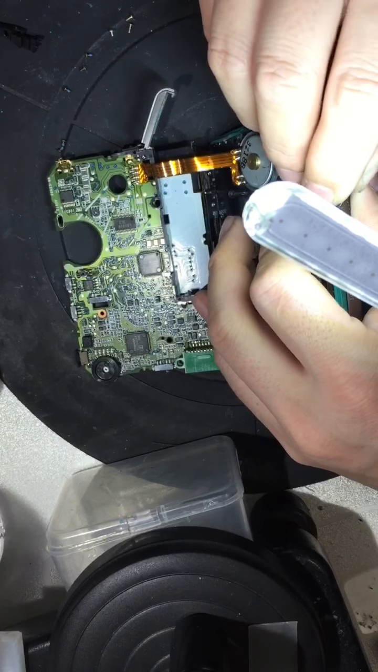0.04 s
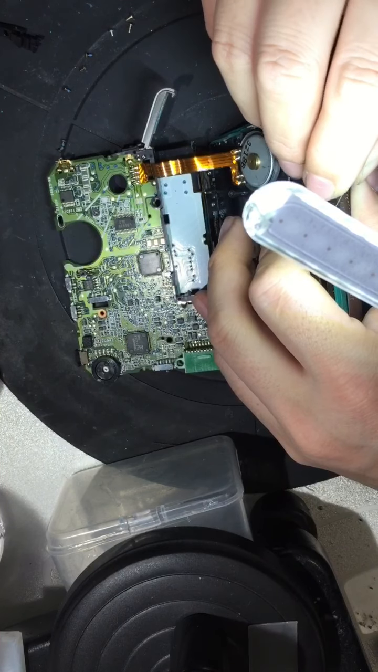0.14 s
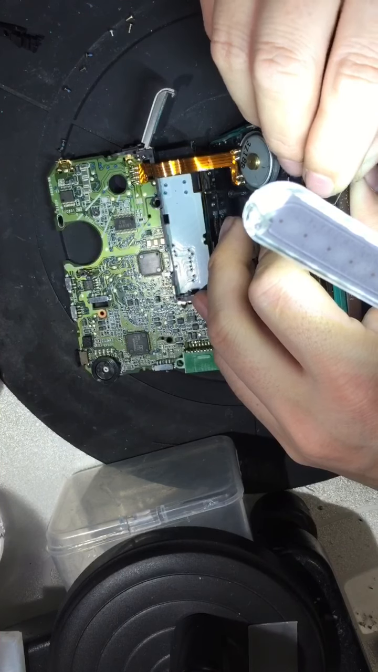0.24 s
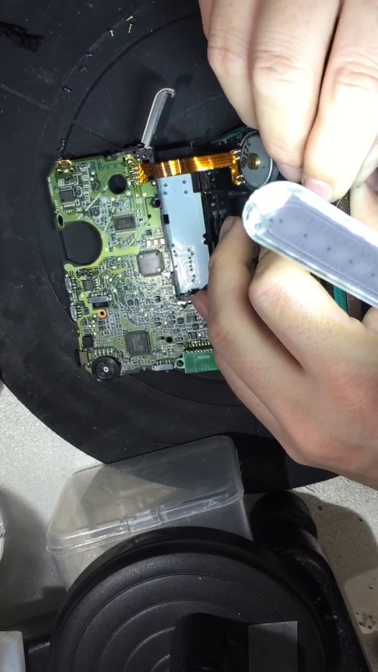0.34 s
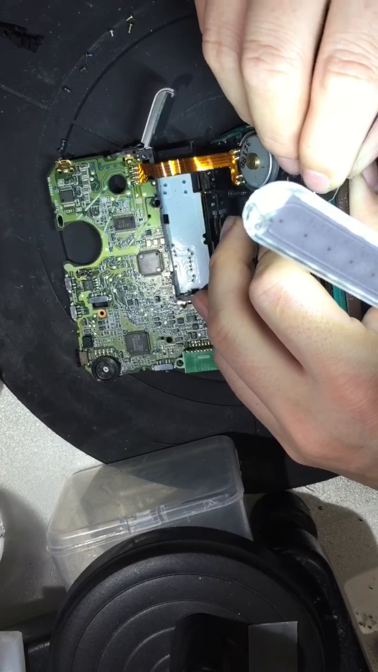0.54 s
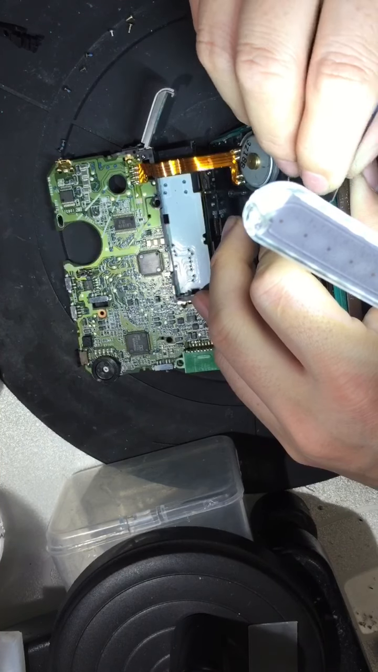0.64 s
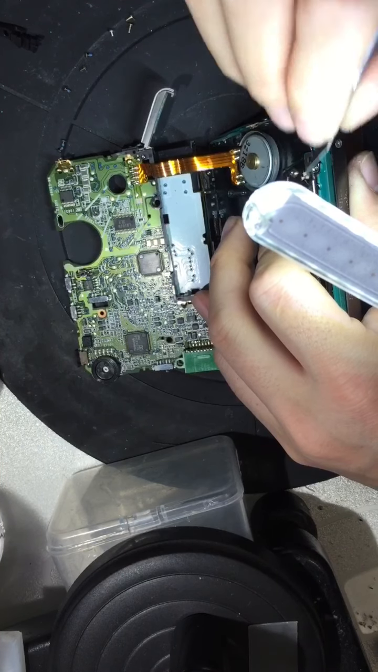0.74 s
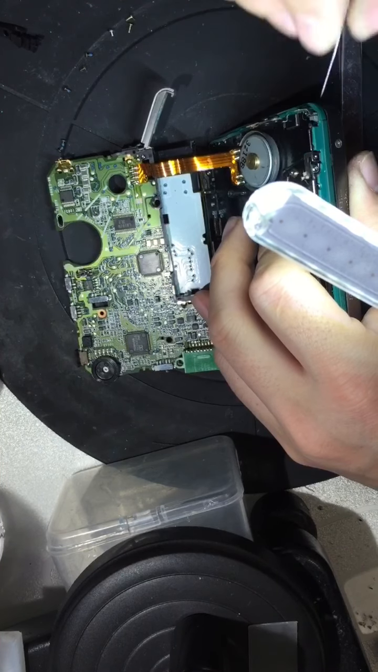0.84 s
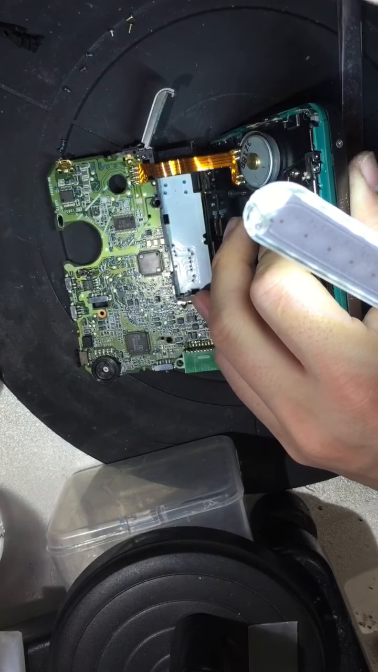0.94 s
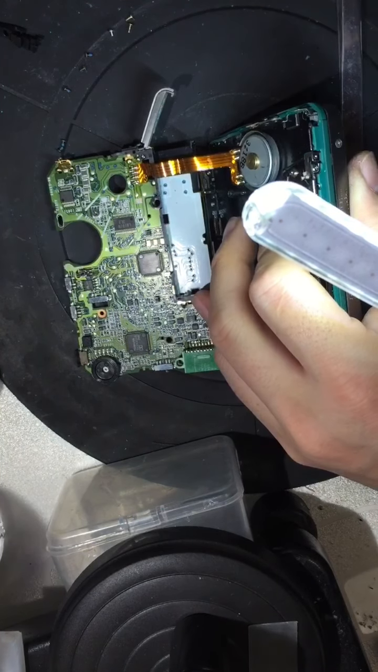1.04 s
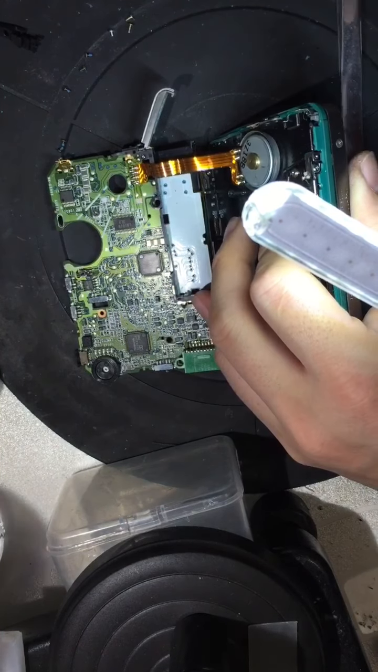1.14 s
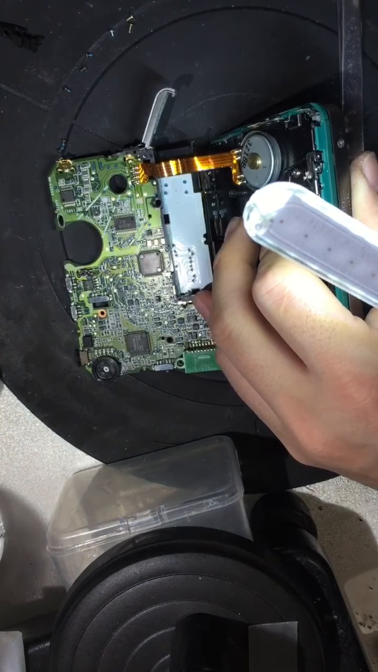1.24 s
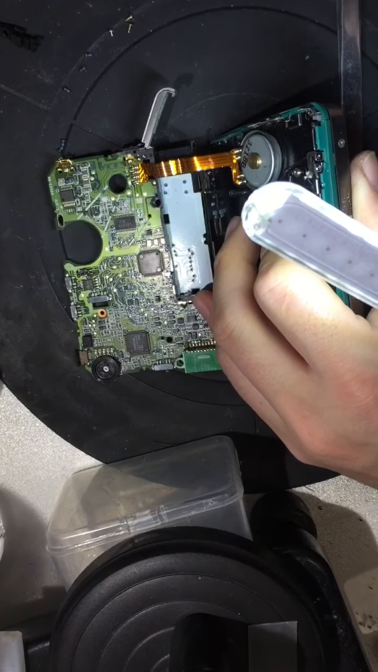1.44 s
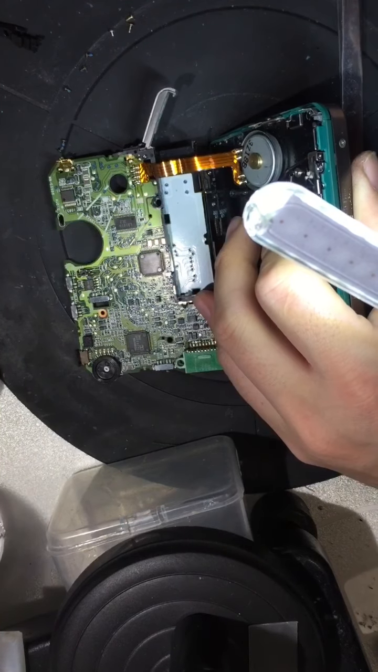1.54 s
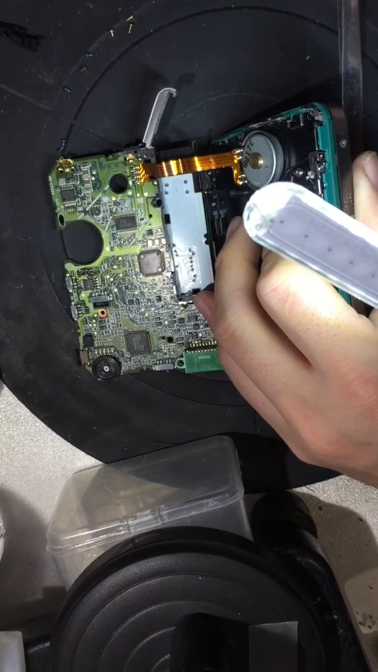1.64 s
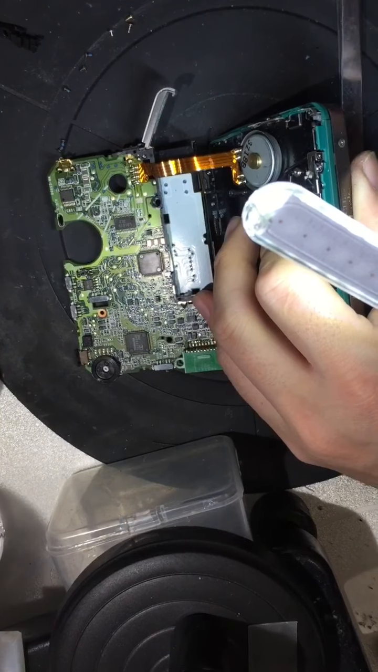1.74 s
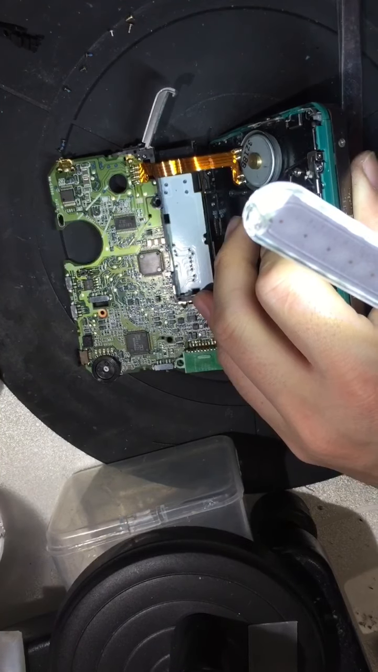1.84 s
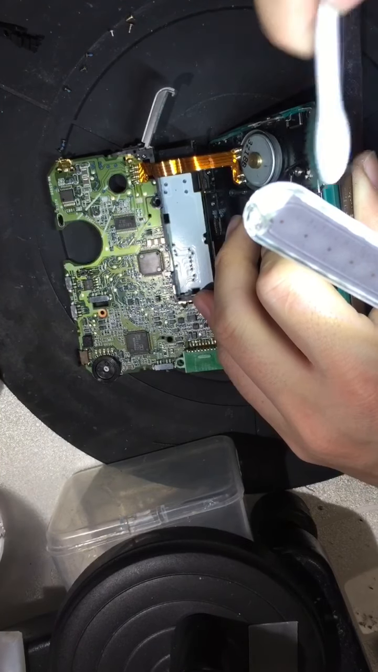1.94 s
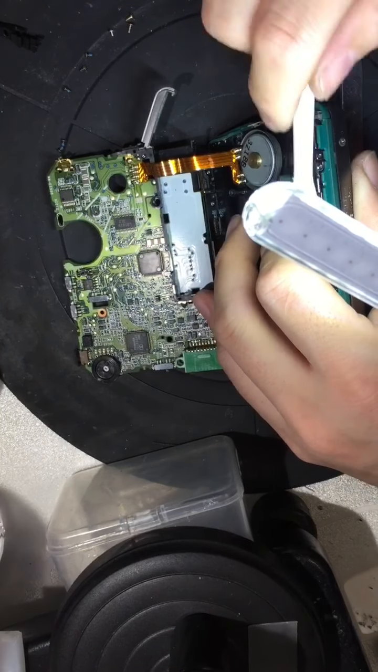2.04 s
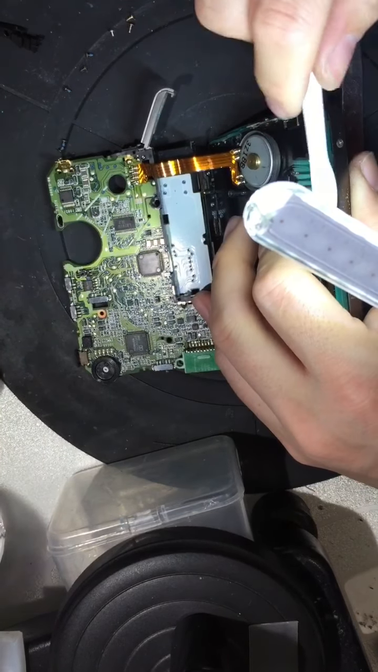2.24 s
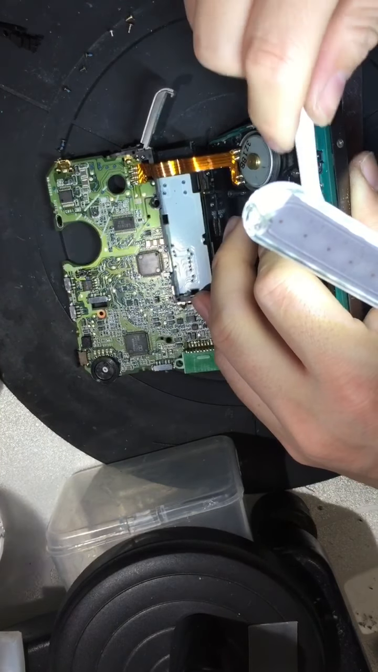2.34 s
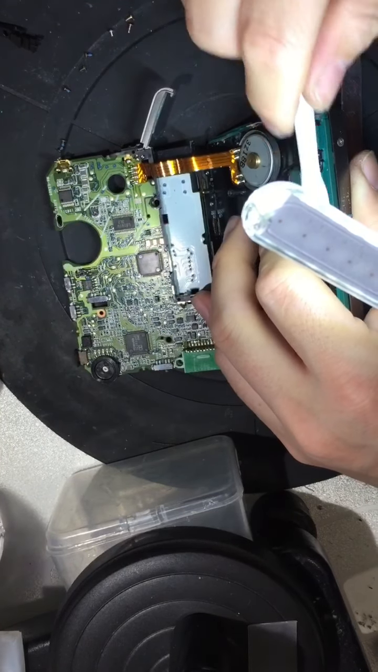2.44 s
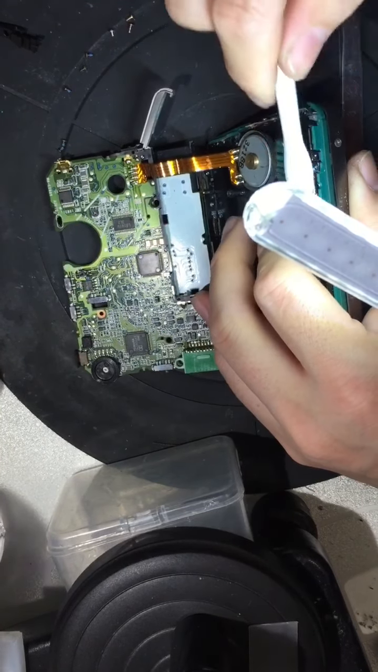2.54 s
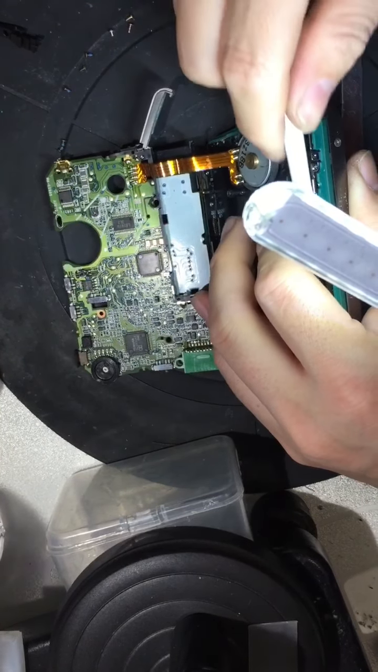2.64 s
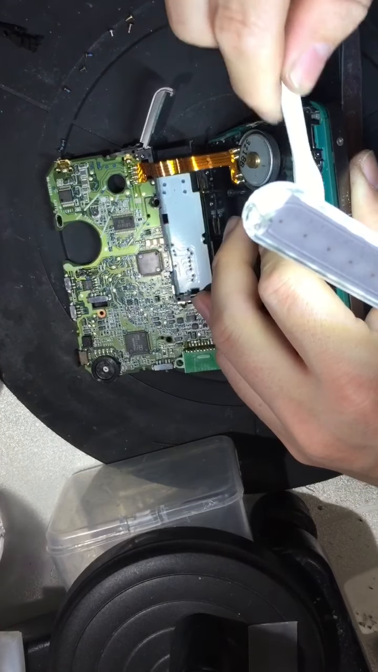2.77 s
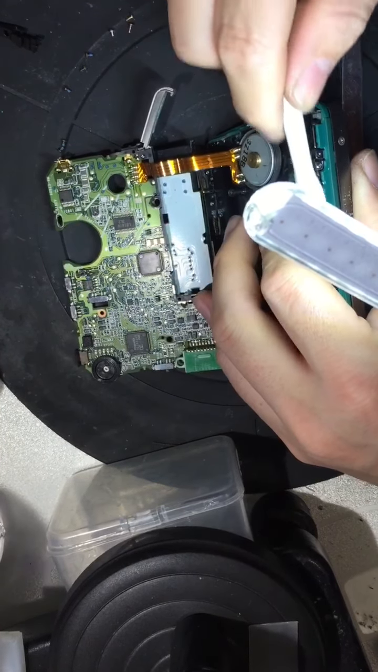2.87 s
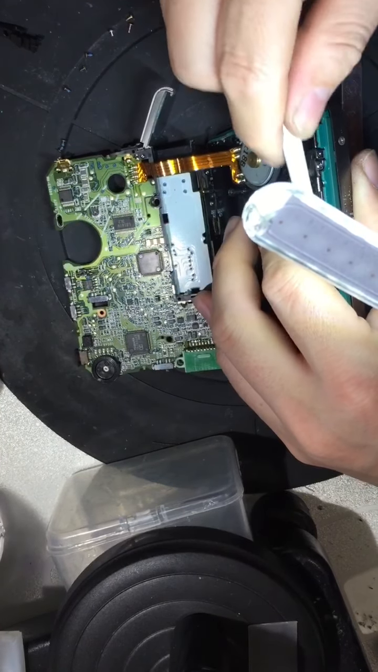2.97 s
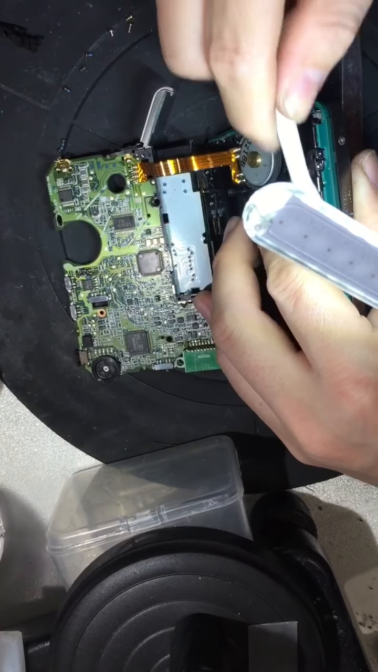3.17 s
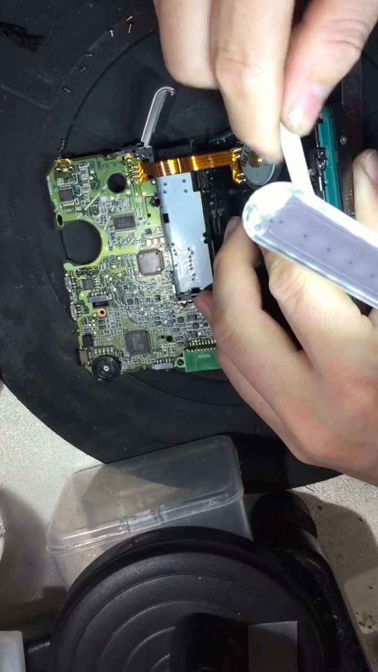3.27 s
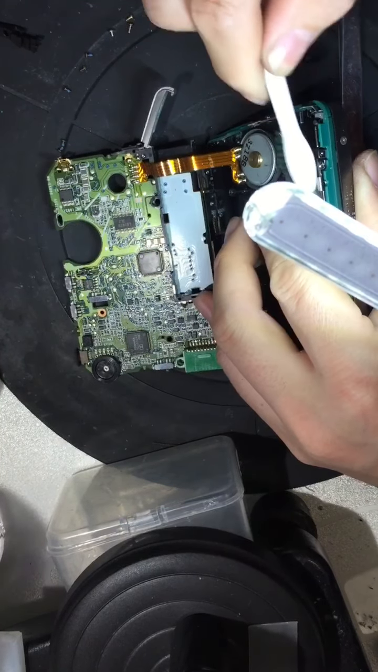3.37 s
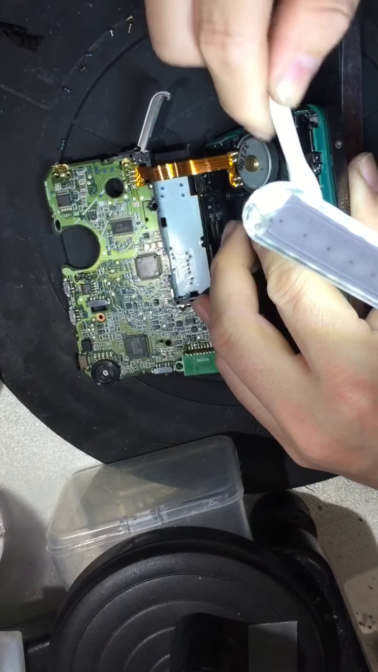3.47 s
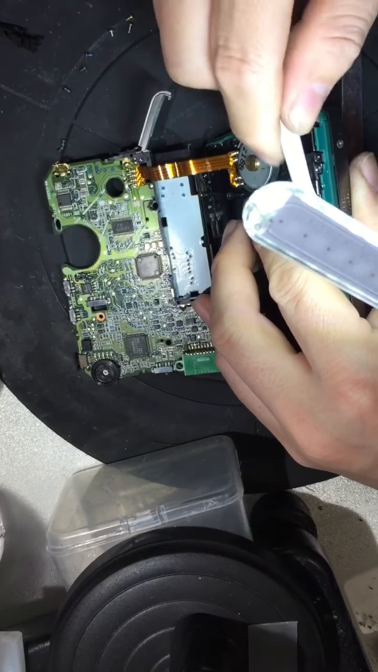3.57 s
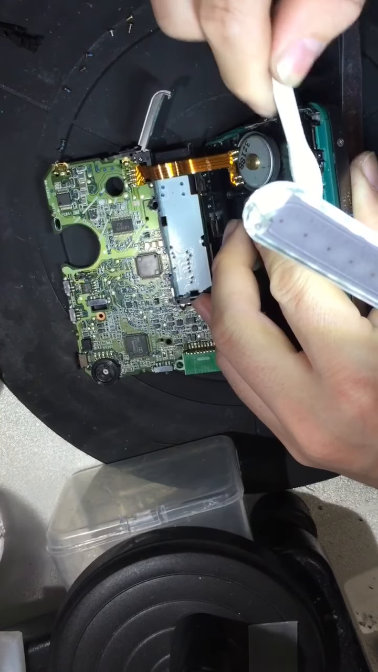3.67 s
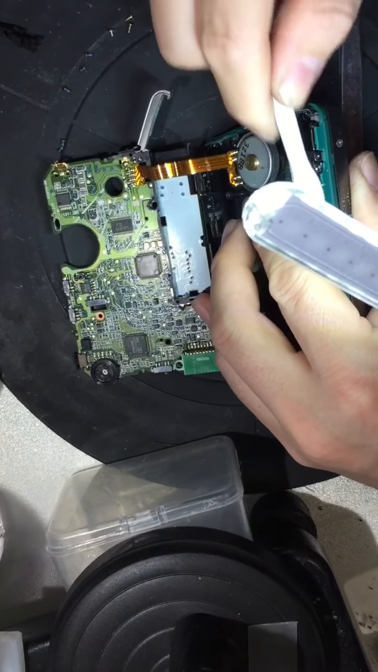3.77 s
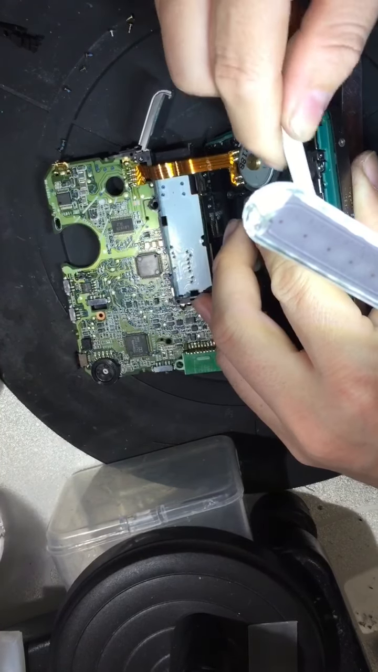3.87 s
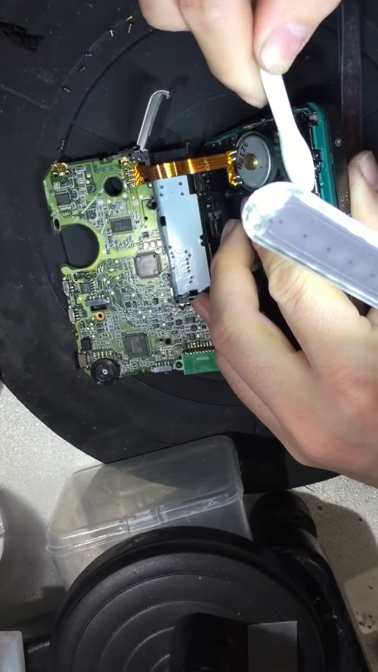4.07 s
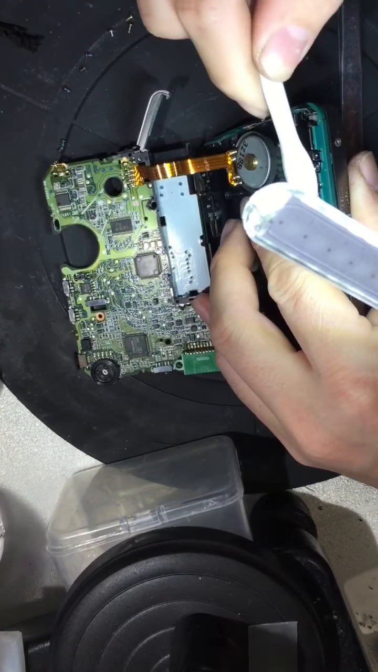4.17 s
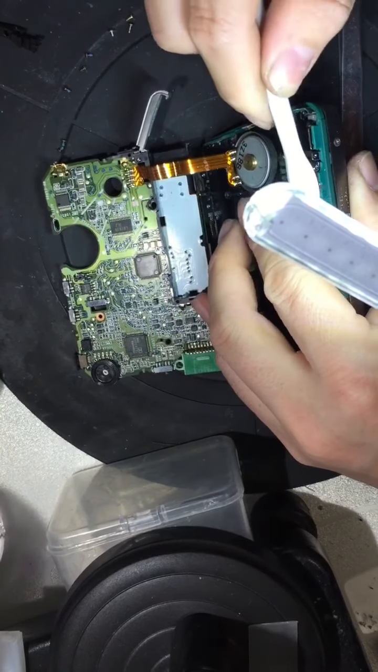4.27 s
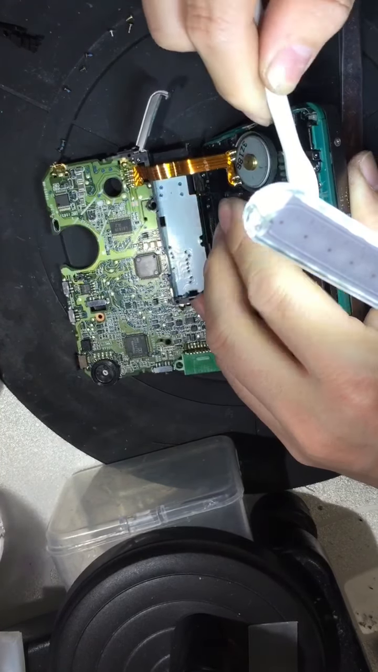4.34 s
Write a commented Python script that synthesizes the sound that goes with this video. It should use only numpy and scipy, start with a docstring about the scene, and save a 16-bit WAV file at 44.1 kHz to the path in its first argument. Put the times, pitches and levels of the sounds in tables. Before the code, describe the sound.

At a quiet bench in a small dry room, fingers softly rub a plastic case and tweezers tick. They are set down with one loud, bright clack and a small rattle. After a brief pause, a plastic tool scrapes in short hissy strokes with light knocks; later strokes are much stronger, with the case dragging dully. Close microphone, faint low background noise.

```python
"""A quiet repair bench, where an opened portable cassette player is worked on in a small, dry room. Tweezers
tick as bright noise cracks over ringing arms and go down with a clack that rings the work plate. A finger winds
a pulley in scraping strokes and fingers rub: random tiny slips drive resonances of parts, chassis and case.
Parts knock as short pushes into the chassis; the case drags as dull filtered slips. Hands and blows make a low
rumble in the bench, over faint steady background noise."""
import sys
import numpy as np
from scipy import signal
from scipy.fft import rfft, irfft
from scipy.io import wavfile

SR = 44100
rng = np.random.default_rng(int(sys.argv[2]) if len(sys.argv) > 2 else 0)


def digitize_waveform(pressure):
    """Quantize a signal to 16-bit integers and store it at the path in sys.argv[1].

    Rows of a 2-D input are taken as channels; values are limited to [-1, 1].
    """
    field = np.atleast_2d(pressure).T
    bounded = np.clip(field, -1, 1)
    quanta = np.round(bounded * 32767).astype(np.int16)
    wavfile.write(sys.argv[1], SR, quanta)


N = 340011
TIME = np.arange(N) / SR
HALF_SECOND = SR // 2   # samples


def from_db(db):
    """Decibels to gain."""
    return 10 ** (np.asarray(db) / 20)


def rms_one(x):
    """Scale to unit power."""
    return x / np.sqrt(np.mean(x ** 2) + 1e-20)


def peak_one(x):
    """Scale so that the eight strongest samples average one."""
    return x / np.mean(np.sort(np.abs(x))[-8:])


def add(track, s, sound):
    """Mix a short sound into a track at time s."""
    at = max(round(s * SR), 0)
    track[at:at + len(sound)] += sound[:max(N - at, 0)]


def colour(x, spectrum):
    """Causal (minimum-phase) filter with the given spectrum, built by folding its cepstrum."""
    size = 8192
    hz, db = np.transpose(spectrum)
    grid = np.maximum(np.arange(size // 2 + 1) * SR / size, 1)
    curve_db = np.interp(np.log(grid), np.log(hz), db)
    cepstrum = irfft(np.log(from_db(curve_db)))
    cepstrum[1:size // 2] *= 2
    cepstrum[size // 2 + 1:] = 0
    impulse = irfft(np.exp(rfft(cepstrum)))
    return signal.fftconvolve(x, impulse)[:len(x)]


def burst(t60):
    """A contact's brief chatter: noise that dies away by 60 dB in t60 seconds."""
    return rng.standard_normal(HALF_SECOND) * from_db(-60 * TIME[:HALF_SECOND] / t60)


def ring(modes, spread_db):
    """Decaying sines, with strengths that differ from blow to blow."""
    t = TIME[:HALF_SECOND]
    out = 0
    for k, (hz, db, t60) in enumerate(modes):
        strength_db = db + spread_db * rng.standard_normal()
        decay = from_db(strength_db - 60 * t / t60)
        out = out + (-1) ** k * decay * np.sin(2 * np.pi * hz * t)
    return out


def friction(per_s, spread_db):
    """Tiny slips of uneven size, at random moments."""
    sizes = from_db(spread_db * np.minimum(rng.exponential(1, N), 5))
    signs = rng.choice([-1, 1], N)
    slipping = rng.random(N) < per_s / SR
    return rms_one(sizes * signs * slipping)


def grip(rate, depth_db, order=N):
    """The contact catches and eases at random: a gain that glides to a new value rate times a second."""
    steps = TIME[:order] * rate
    points = rng.standard_normal(4096)
    return np.interp(steps, np.arange(len(points)), from_db(depth_db * points))


def resonate(force, modes, wander_db):
    """Parallel resonances; the moving point of contact feeds now one, now another."""
    out = 0
    for k, (hz, width, db) in enumerate(modes):
        r = np.exp(-np.pi * width / SR)
        poles = [1, -2 * r * np.cos(2 * np.pi * hz / SR), r * r]
        drive = force * grip(rate=45, depth_db=wander_db, order=len(force)) + 1e-18
        gain = (-1) ** k * from_db(db) * (1 - r * r) / 2
        out = out + gain * signal.lfilter([1, 0, -1], poles, drive)
    return out


# spectrum of the background noise: (frequency [Hz], level [dB])
AIR_COLOUR = [(20, -9), (60, 4.5), (130, -2), (280, -5), (700, -10.5), (1500, -13), (3000, -16),
              (8000, -22), (16000, -27.5)]
AIR_DB = -71


def air():
    """Faint steady noise, strongest in the bass."""
    return from_db(AIR_DB) * rms_one(colour(rng.standard_normal(N), AIR_COLOUR))


# spectrum of the bench rumble: (frequency [Hz], level [dB])
RUMBLE_COLOUR = [(25, -33), (62, -9.5), (85, -16), (117, 5), (138, -8.5), (155, -4), (173, -12),
                 (193, -5.5), (250, -16.5), (400, -28.5), (800, -55.5)]
RESTING_DB = -78.5   # rumble from hands resting on the case
DRAG_WEIGHT_DB = -4.5   # rumble in the bench relative to the drag
SHUDDER_DB, SHUDDER_T60_S = -14.5, 0.41   # after a blow, relative to its thud setting
BENCH_LAG_S, BENCH_SETTLE_S = 0.011, 0.012   # delay; smoothing time constant


def handling():
    """Every stroke, rub, shove and blow leans on the bench, which rumbles and settles."""
    load = from_db(RESTING_DB) ** 2 + (from_db(DRAG_WEIGHT_DB) * drag_level()) ** 2
    for s, rise, fall, db, weight_db in STROKES:
        add(load, s + BENCH_LAG_S, (from_db(weight_db) * stroke_speed(rise, fall, db)) ** 2)
    for s, length, db, weight_db in RUBS:
        add(load, s + BENCH_LAG_S, (from_db(weight_db) * rub_speed(length)) ** 2)
    for s, clack_db, thud_db in BLOWS:
        shudder_db = thud_db + SHUDDER_DB - 60 * TIME[:SR] / SHUDDER_T60_S
        add(load, s, from_db(shudder_db) ** 2)
    keep = np.exp(-1 / (BENCH_SETTLE_S * SR))
    pressure = np.sqrt(signal.lfilter([1 - keep], [1, -keep], load))
    rumble = rms_one(colour(friction(per_s=1000, spread_db=2.5), RUMBLE_COLOUR))
    return pressure * rumble


def rub_speed(length):
    """A fingertip slides in one flat arch."""
    progress = np.minimum(TIME[:HALF_SECOND] / length, 1)
    return np.abs(np.sin(np.pi * progress)) ** 0.4


# fingertips rubbing on the case: (time [s], length [s], level [dB], weight on the bench [dB])
RUBS = [(0.042,0.075,-53.5,-53), (0.223,0.072,-71,-75), (0.362,0.057,-60,-51.5), (0.466,0.051,-53,-64),
        (0.65,0.035,-66,-47), (0.761,0.032,-55.5,-50.5), (0.81,0.081,-82,-49.5), (1.037,0.088,-62.5,-61),
        (1.307,0.27,-72,-55.5), (4.349,0.076,-67.5,-63.5), (7.189,0.067,-81.5,-67)]
# hollow resonances of the case: (frequency [Hz], width [Hz], level [dB])
CASE = [(560, 38, 9), (1030, 130, -7.5), (2395, 66, 4), (3050, 160, -0.5), (3510, 260, -5), (5360, 260, -1),
        (6180, 1200, -15), (9080, 1600, -14.5), (11770, 2840, -21.5)]


def rubbing():
    """Skin drags softly over the case and sounds its hollow resonances."""
    pressure = np.zeros(N)
    for s, length, db, weight_db in RUBS:
        add(pressure, s, from_db(db) * rub_speed(length))
    slips = friction(per_s=4000, spread_db=2.0)
    return pressure * rms_one(resonate(slips, CASE, wander_db=8.5))


# parts knocking on the chassis: (time [s], level [dB], sharp edge rel. level [dB], part's own pitch [Hz])
KNOCKS = [(0.075,-50.5,-20,585), (0.665,-46,-22,560), (0.846,-41.5,-16,2270), (0.853,-38,-30,860),
          (0.861,-44,-38,735), (1.053,-37.5,-6.5,1450), (1.399,-20.5,-10.5,1240), (1.43,-30,-9,2920),
          (1.523,-48,-16,2960), (1.661,-40.5,-30,2880), (1.666,-38.5,-29,2610), (1.704,-46.5,-32,2708),
          (2.266,-28.5,-5.5,2100), (2.291,-36.5,-20,2240), (2.402,-39,-11,2200), (2.519,-43,-8.5,1200),
          (2.6,-41,-7,1430), (2.714,-43,-42,580), (2.981,-31,-44,1320), (3.271,-27.5,-15,1320),
          (3.463,-39.5,-15,1730), (3.487,-37.5,-14,1150), (3.545,-41,-20,3570), (3.605,-29,-16,1540),
          (3.898,-26,-16,1487), (4.04,-39,-25,1400), (4.09,-38.5,-25.5,1160), (4.548,-51,-27,574),
          (4.606,-31,-21,1590), (4.992,-45.5,-10.5,2040), (5.058,-34,-34,1020), (5.078,-34.5,-30,1440),
          (5.176,-57,11,3800), (5.317,-29,-13.5,3940), (5.794,-35,-20.5,565), (5.808,-58,-10,800),
          (6.473,-32,-11.5,1960), (6.643,-40.5,-5,2250), (6.679,-25,-34,1034), (6.895,-23,-34,890),
          (7.237,-43,-41,2460), (7.657,-37.5,-29.5,826)]
# resonances of the chassis, also shaken by scraping: (frequency [Hz], width [Hz], level [dB])
CHASSIS = [(570, 64, 2.5), (894, 220, -5.5), (1166, 62, -2), (1465, 51, -3), (1730, 82, -4.5),
           (2176, 67, -3), (2416, 41, -8), (2850, 49, -10.5), (3450, 210, -16.5), (3740, 480, -12),
           (5540, 750, -10.5)]
# spectrum of a knock's sharp edge: (frequency [Hz], level [dB])
KNOCK_EDGE = [(1500, -5.5), (3000, -7.5), (6000, -5), (8000, -11), (16000, -21.5)]
PART_WIDTH = 0.17   # bandwidth of a part's ring, as a share of its pitch


def knocks():
    """A part drops into place: a push and short chatter ring the part and the chassis, with a sharp edge."""
    out = np.zeros(N)
    for s, db, edge_db, part_hz in KNOCKS:
        force = 0.25 * burst(t60=0.029)
        force[0] += 1
        # plastic cushions the push
        force = colour(force, [(2000, 1.0), (4000, -6.0), (8000, -14.5), (16000, -5)])
        body = peak_one(resonate(force, CHASSIS, wander_db=4.2))
        part = peak_one(resonate(force, [(part_hz, PART_WIDTH * part_hz, 0)], wander_db=4))
        edge = peak_one(colour(burst(t60=0.018), KNOCK_EDGE))
        knock = from_db(-6.0) * body + from_db(-6.5) * part + from_db(edge_db + 6) * edge
        add(out, s, from_db(db) * knock)
    return out


ROUNDNESS = 0.74   # exponent of a soft stroke's arch
POINTED_ABOVE_DB, POINTED_PER_DB = -41.5, 1.3   # harder strokes swell to a sharper point


def stroke_speed(rise, fall, db):
    """A stroke speeds up and slows down; above a set level, the harder it is, the more pointed."""
    progress = np.interp(TIME[:HALF_SECOND], [0, rise, rise + fall], [0, 0.5, 1])
    sharpness = ROUNDNESS + POINTED_PER_DB * max(db - POINTED_ABOVE_DB, 0)
    return np.abs(np.sin(np.pi * progress)) ** sharpness


# scraping strokes: (time [s], rise [s], fall [s], level [dB], weight on the bench [dB])
STROKES = [(0.745,0.021,0.018,-53.5,-66), (2.241,0.035,0.062,-56,-62), (2.362,0.071,0.055,-53,-54),
           (2.506,0.066,0.067,-54.5,-56), (2.667,0.083,0.029,-50,-57), (2.804,0.058,0.059,-50,-59),
           (2.956,0.061,0.038,-50.5,-58.5), (3.084,0.074,0.04,-48,-50), (3.241,.078,0.023,-50,-54.5),
           (3.37,.1,.043,-46,-44.5), (3.535,0.053,0.091,-51,-49.5), (3.69,0.1,0.038,-48,-49.5),
           (3.841,0.035,0.099,-49.5,-56.5), (3.989,0.1,0.037,-46,-45), (4.573,0.078,0.023,-48.5,-57),
           (4.698,0.054,.1,-48.5,-52.5), (4.865,0.062,0.038,-46,-54.5), (4.984,0.096,0.043,-48,-48),
           (5.135,0.026,0.11,-55,-59.5), (5.267,0.04,0.058,-46,-49.5), (5.749,0.087,.0085,-36.5,-51),
           (5.986,0.064,0.067,-37.5,-56), (6.182,0.076,0.0073,-40,-54), (6.4,0.064,0.027,-41.5,-52.5),
           (6.599,0.052,0.04,-41.5,-48.5), (6.806,0.062,0.0075,-41,-44), (7.519,0.019,0.013,-54.5,-58.5),
           (7.586,0.02,0.09,-52,-54.5)]
# resonances of the small parts: (frequency [Hz], width [Hz], level [dB])
PARTS = [(2900, 920, -2), (3956, 87, 2), (4560, 110, -7), (5585, 200, 11), (6040, 370, -3.5),
         (6580, 360, -0.5), (7580, 270, -2.5), (8160, 160, -11), (8500, 250, 3), (9180, 130, 3.5),
         (9470, 650, -0.5), (10880, 330, -4.5), (11660, 140, -9), (12900, 200, 5), (12590, 170, -11),
         (13800, 290, -24), (14700, 690, 3), (14180, 600, -0.5)]
# spectrum of the scraping tip: (frequency [Hz], level [dB])
HISS = [(2000, 8.5), (3400, 8.5), (4900, 4.5), (5700, 6), (6700, 11), (7900, 3.5), (9000, 5),
        (10400, -10.5), (11700, 15.5), (13500, -10), (16000, -24)]
# chassis level at a given stroke level; its share of the swing
CHASSIS_DB, CHASSIS_AT_DB, CHASSIS_FOLLOWS = -57.5, -50, 0.66
CATCHES_PER_S, CATCH_DB = 90, -11.5   # the tip snags now and then; level relative to the grit friction


def scraping():
    """Each stroke swells and fades; its slips hiss at the tip, ring the small parts and shake the chassis."""
    hiss, body = np.zeros(N), np.zeros(N)
    for s, rise, fall, db, weight_db in STROKES:
        speed = stroke_speed(rise, fall, db)
        add(hiss, s, speed * from_db(db))
        add(body, s, speed * from_db(CHASSIS_DB + CHASSIS_FOLLOWS * (db - CHASSIS_AT_DB)))
    catching = grip(rate=170, depth_db=1.8)
    tip = rms_one(colour(catching * friction(per_s=7000, spread_db=2.0), HISS))
    # coarse grit is felt by the small parts and the chassis alike
    grit = catching * friction(per_s=1800, spread_db=3.9)
    grit = grit + from_db(CATCH_DB) * friction(per_s=CATCHES_PER_S, spread_db=1.5)
    parts = rms_one(resonate(grit, PARTS, wander_db=4.0))
    chassis = rms_one(resonate(grit, CHASSIS, wander_db=3.2))
    return hiss * (from_db(-10) * tip + from_db(-7.0) * parts) + body * chassis


SETTLE_S, SETTLE_DB, SETTLE_RING_DB = 1.551, -21.5, -14   # first touch: time, level, ringing arms
BOUNCE_GAP_S, BOUNCE_LOSS_DB, BOUNCE_SPREAD_DB = 0.01, 1, 7   # step and loss per touch; random swing +/-


def bounces(count):
    """The dropped tweezers touch again and again, unevenly and on the whole more weakly."""
    touches = []
    for k, (late, luck) in enumerate(rng.uniform(-1, 1, (count, 2))):
        s = SETTLE_S + (k + 0.17 * late) * BOUNCE_GAP_S
        db = SETTLE_DB - k * BOUNCE_LOSS_DB + BOUNCE_SPREAD_DB * luck
        touches.append((s, db, SETTLE_RING_DB))
    return touches


# light metal contacts: (time [s], level [dB], ringing of the tweezers' arms, relative [dB])
TICKS = [(0.763,-37,-32), (0.783,-41,-35), (0.892,-40.5,-32), (1.051,-38.5,-32), (1.13,-31.5,-19),
         (1.163,-46.5,-30), (1.399,-9.5,-23), (1.433,-31,-26), (1.459,-37.5,-26), (1.523,-33,-34),
         (2.128,-56,-30.5), (3.596,-31,-14), (4.43,-52.5,-30.5), (5.147,-39.5,-33), (5.318,-30.5,-29.5),
         (5.611,-58.5,-25), (6.061,-24.5,-33), (6.22,-45,-38), (6.252,-24.5,-34), (6.471,-31.5,-39),
         (7.334,-52,-31.5)]
# spectra of a tick's and a bounce's crack: (frequency [Hz], level [dB])
TICK_COLOUR = [(1500, -12.5), (4000, -7), (6000, -3), (9000, 2.5), (10400, -5.5), (12200, 3.5),
               (16000, -4.5)]
BOUNCE_COLOUR = [(1500, -13), (4000, -15.5), (5500, -6.5), (8800, -2), (10200, 3.5), (11500, 7),
                 (16000, -8.5)]
# modes of the tweezers' arms: (frequency [Hz], level [dB], t60 [s])
TWEEZERS = [(5373, -18, .1), (7500, -12, .05), (8123, -14, .12), (8900, -6, .06), (9700, -10, .04),
            (11110, -7, .13), (11400, -7, .06), (11754, -9, .05), (12256, -9, .04), (14090, -8, .07)]


def ticks():
    """Metal touches give a bright crack; the tweezers' arms ring by an amount set for each touch."""
    out = np.zeros(N)
    for touches, spectrum in ((TICKS, TICK_COLOUR), (bounces(count=6), BOUNCE_COLOUR)):
        for s, db, ring_db in touches:
            crack = peak_one(colour(burst(t60=0.026), spectrum))
            arms = peak_one(ring(TWEEZERS, spread_db=4))
            add(out, s, from_db(db - 4.5) * (crack + from_db(ring_db + 2.5) * arms))
    return out


# blows on the work plate: (time [s], sharp clack level [dB], soft thud level [dB])
BLOWS = [(0.854,-36.5,-55), (1.399,-8.5,-30), (1.432,-30,-29.5), (1.524,-44,-33.5), (1.668,-39,-25.5),
         (5.808,-33.5,-43), (6.68,-53,-42.5), (6.894,-32,-37)]
# modes of the work plate: (frequency [Hz], level [dB], t60 [s])
PLATE = [(234, -12.5, 0.22), (277.6, -4, 0.091), (344, -8, 0.099), (374.8, -3.5, 0.1), (542.4, -8.5, 0.11),
         (607, -13, .07), (689, -14.5, 0.062), (790, -5.5, 0.014), (984, -9, 0.099), (1162, -4, 0.077),
         (1267, -8, .07), (1410, -12.5, 0.068), (1616, -15.5, 0.048), (1800, -18.5, 0.083)]
# modes of the bench under the plate: (frequency [Hz], level [dB], t60 [s])
BENCH = [(68.2, -9, .3), (116.4, 2, .35), (154.3, -9, 0.32), (191.4, -6.5, 0.19), (308.6, -10, 0.098),
         (400, -12.5, 0.13)]


def blows():
    """A hard blow jolts the plate and leaves it ringing; the weight behind it booms in the bench."""
    out = np.zeros(N)
    t = TIME[:HALF_SECOND]
    # the contact force builds up over a fraction of a millisecond
    build_up = 1 - np.exp(-t / 0.00036)
    jolt = np.sin(2 * np.pi * 740 * t) * from_db(-60 * t / 0.0059) * build_up
    for s, clack_db, thud_db in BLOWS:
        plate = peak_one(ring(PLATE, spread_db=2.0))
        bench = peak_one(ring(BENCH, spread_db=2.5))
        add(out, s, from_db(clack_db) * (from_db(8.5) * jolt + from_db(-10.5) * plate))
        add(out, s, from_db(thud_db + 0.5) * bench)
    return out


# the case is shoved across the plate: (time [s], length [s], level [dB])
DRAGS = [(0.873,0.061,-68), (4.35,0.11,-75), (5.38,.19,-75), (5.752,0.27,-49.5), (5.978,0.17,-52.5),
         (6.169,0.11,-55.5), (6.34,0.26,-66.5), (6.624,0.15,-51.5), (6.797,.15,-50.5)]
DRAG_ATTACK_S, DRAG_SAG_DB_PER_S = 0.024, 7.5
DRAG_RELEASE_DB_PER_S = 208   # on top of the sag, once the shove's length is over


def drag_level():
    """Each shove starts the case sliding, sags a little and then lets it come to rest."""
    power, t = np.zeros(N), TIME[:SR]
    for s, length, db in DRAGS:
        fade_db = DRAG_SAG_DB_PER_S * t + DRAG_RELEASE_DB_PER_S * np.maximum(t - length, 0)
        attack = np.minimum(t / DRAG_ATTACK_S, 1)
        add(power, s, (attack * from_db(db - fade_db)) ** 2)
    return np.sqrt(power)


# spectrum of the case on the plate: (frequency [Hz], level [dB])
DRAG_COLOUR = [(250, -5.5), (420, -7.5), (580, 4), (700, -8.5), (900, 3), (1250, -2.5), (1480, -16.5),
               (1780, 1), (2400, -7.5), (4000, -14.5), (8000, -24.5), (16000, -32)]


def dragging():
    """The sliding case rubs dully on the plate: dense slips under an uneven grip."""
    slips = friction(per_s=5900, spread_db=1.0) * grip(rate=110, depth_db=3.5)
    return drag_level() * rms_one(colour(slips, DRAG_COLOUR))


def room(x, wet_db, t60):
    """Dense reflections from the bench and near walls: a noise tail that builds up and dies away."""
    tail = burst(t60) * (1 - np.exp(-TIME[:HALF_SECOND] / 0.0098))
    tail = colour(tail, [(100, 1), (1000, -2.5), (5000, -1.5), (16000, -9.5)])
    tail = tail / np.sqrt(np.sum(tail ** 2))
    return from_db(wet_db) * signal.fftconvolve(x, tail)[:N]


def scene():
    """All the contacts in a small, dry room, with drag, rumble and faint steady noise."""
    contacts = rubbing() + knocks() + scraping() + ticks() + blows()
    reflections = room(contacts, wet_db=-17.0, t60=0.2)
    return (air() + handling() + contacts + reflections + dragging())[None]


CUTOFF_HZ = 16200


def record(dry):
    """The microphone loses the deepest bass; the top is cut steeply."""
    bass_cut = signal.butter(2, 42, "high", fs=SR, output="sos")
    top_cut = signal.ellip(10, 0.1, 70, CUTOFF_HZ, fs=SR, output="sos")
    thinned = signal.sosfilt(bass_cut, dry)
    return signal.sosfilt(top_cut, thinned)


dry = scene()
out = record(dry)
digitize_waveform(out)
```